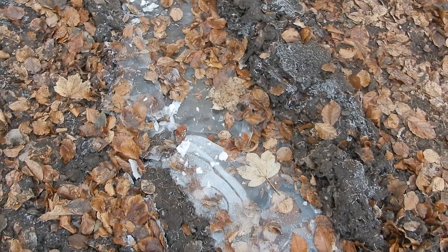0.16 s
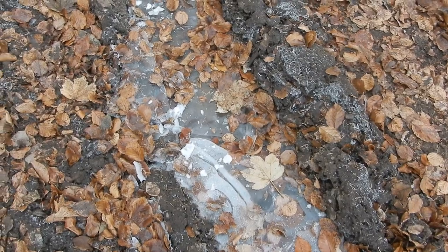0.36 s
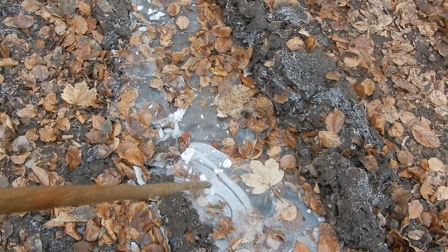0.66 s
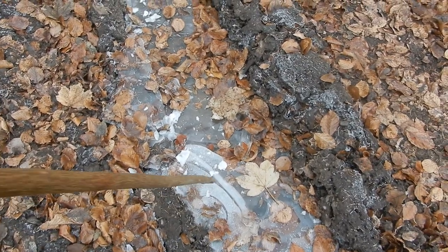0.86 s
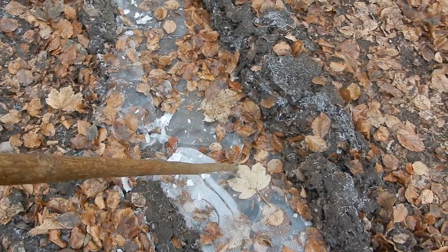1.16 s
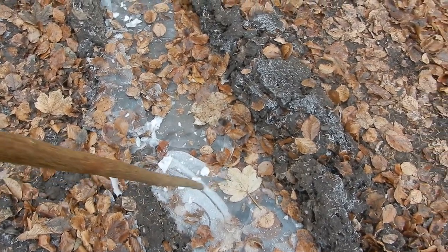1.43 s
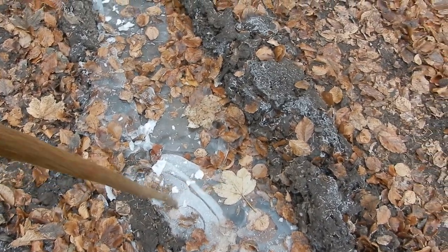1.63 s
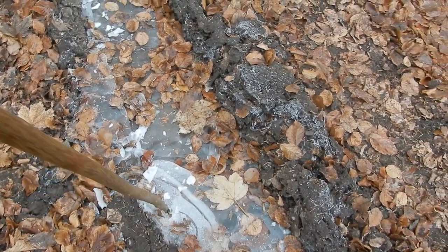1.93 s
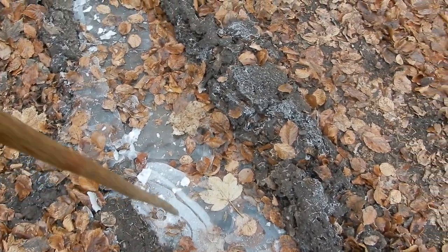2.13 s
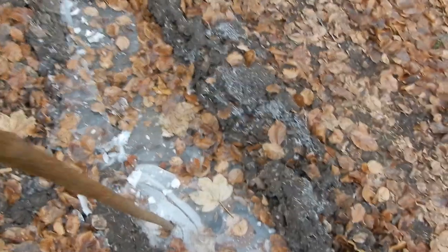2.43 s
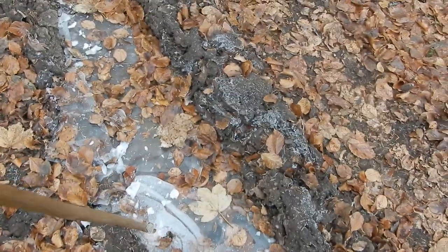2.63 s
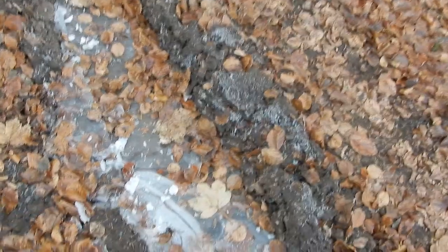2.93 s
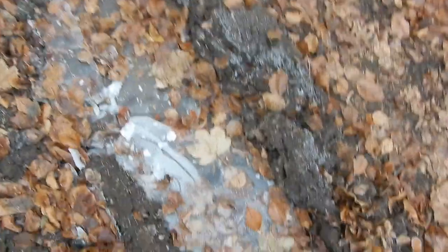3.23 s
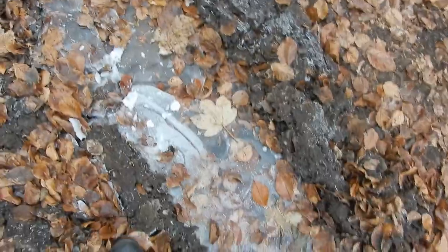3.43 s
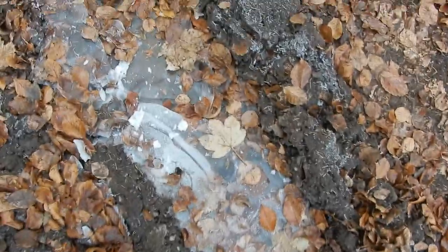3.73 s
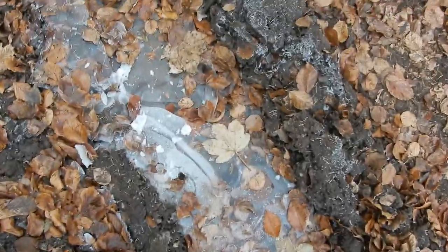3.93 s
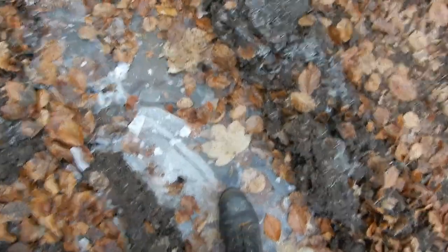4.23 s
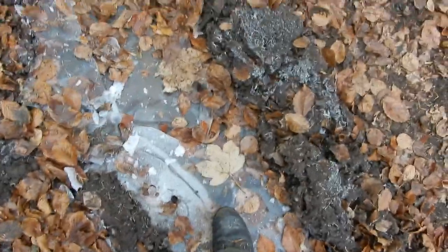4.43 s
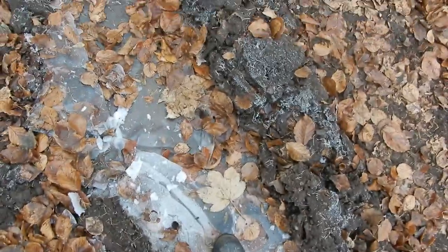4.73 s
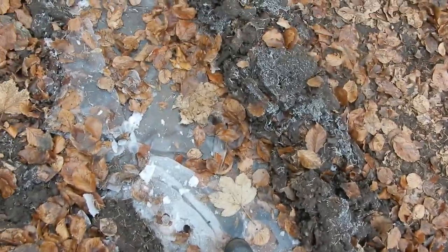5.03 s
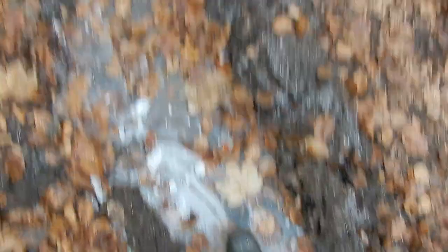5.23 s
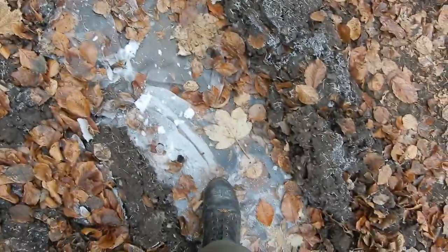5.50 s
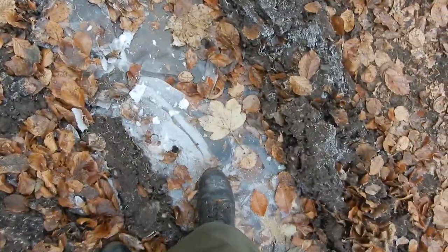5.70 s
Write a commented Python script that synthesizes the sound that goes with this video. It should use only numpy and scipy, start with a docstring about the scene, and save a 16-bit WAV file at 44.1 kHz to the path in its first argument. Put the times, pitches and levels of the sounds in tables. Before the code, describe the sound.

Thin puddle ice knocks and cracks under a poking stick, then crunches and splinters under a boot among frozen leaves.

```python
"""Breaking puddle ice in a wood

A stick pokes thin ice, then a boot treads on it among frozen leaves. The sheet thuds over its air
pocket, cracks snap and shed splinters, and each press crunches leaves, shards and frost.
Small pops hit the right microphone port and dull jolts come through the housing,
all over a faint resonant background."""
import sys
import numpy as np
from scipy import signal
from scipy.fft import rfft, irfft
from scipy.io import wavfile

SR = 44100
rng = np.random.default_rng(int(sys.argv[2]) if len(sys.argv) > 2 else 0)


def store_pcm(level_fs):
    """Save levels as 16-bit WAV."""
    pcm = np.round(np.clip(level_fs, -1, 1) * 32767).astype(np.int16)
    wavfile.write(sys.argv[1], SR, np.atleast_2d(pcm).T)


N = 258426
FFT_SIZE = N + 4096
HZ = np.maximum(np.fft.rfftfreq(FFT_SIZE, 1 / SR), 1)

# the background sinks and dulls for a while: (time [s], level [dB], treble shelf [dB])
BACKGROUND_RIDE = [(0, -56, 2), (1.1, -55, 1), (1.78, -56, 1.5), (1.85, -73.5, -12), (2.3, -69.5, -15.5),
                   (2.8, -71, -15.5), (3.1, -62, -16), (4.2, -52.5, -7.5), (5.0, -71, -5.5),
                   (5.86, -60.5, -3)]
# tone of the background: (frequency [Hz], level [dB])
BACKGROUND_EQ = [(25, -2.5), (161, -1), (624, -11), (1000, -21.5), (1560, -12.5), (2840, -32), (3300, -29),
                 (5900, -33), (6500, -38), (16000, -49)]
# bands that stand out of the background: (centre [Hz], width [Hz], boost [dB])
RESONANCES = [(797, 15, 1.5), (1002, 120, 15), (1610, 40, 3), (2410, 100, 13), (2835, 120, 21.5),
              (3400, 33, 11.5), (4120, 120, 10.5), (4800, 76, 4.5), (5400, 100, 4), (5900, 87, 6.5)]
# leaves rustling between the presses: (time [s], level [dB], frost over shards [dB])
LEAF_RUSTLE = [(0, -80, -13), (1.8, -70.5, -13), (2.05, -97.5, 2), (3.15, -95.5, 4), (3.3, -63.5, -10),
               (4.05, -54, 7), (4.35, -59, 0.5), (4.9, -62, 10.5), (5.03, -63, 4), (5.2, -56, 4.5),
               (5.45, -66, 4.5), (5.86, -60.5, 5)]
# pressure steps at the right port: (time [s], level [dB])
PORT_POPS = [(0.034, -16), (2.47, -32), (3.119, -20), (3.32, -11), (3.408, -12.5), (3.448, -16),
             (3.805, 0.5), (3.829, -2.5), (3.944, -5.5)]
# presses of stick or sole; a negative fade reverses the swell, slow in and quick out:
# (peak time [s], crunch [dB], fade by 20 dB [s], frost over shards [dB], grinding [dB])
PRESS_SWELLS = [(.1, -77, .15, 4, -69), (0.233, -60, 0.19, 1, -78), (.74, -67.5, 0.3, -7, -61),
                (1.235, -43.5, 0.0625, -8.5, -55), (1.278, -38.5, 0.0532, -5.5, -42),
                (1.869, -62, 0.02, -1, -56), (1.988, -63, 0.1142, -3, -54), (2.429, -66, .1, -4.5, -64.5),
                (2.618, -62.5, 0.09, 12, -66.5), (2.92, -90, -0.94, -1, -71), (3.24, -53.5, 0.17, 2.5, -48),
                (3.358, -46.5, 0.06, 8.5, -75), (3.522, -25.5, 0.037, 4, -42),
                (3.598, -37.5, 0.02, -6, -48.5), (3.682, -30, 0.1083, 9, -43), (3.818, -26, 0.0517, 5, -33),
                (3.892, -29, 0.14, 7, -43.5), (3.99, -60, 0.16, 8, -52.5), (4.5, -51.5, -0.41, 4, -84.5),
                (4.7, -51, 0.23, 6, -61), (4.829, -51.5, 0.21, 5.5, -69.5), (5.306, -45.5, 0.12, 1.5, -57),
                (5.619, -44.5, 0.15, 4.5, -59.5), (5.76, -66.5, 1.1, 13, -82)]
# modes of the ice sheet over its air pocket: (frequency [Hz], level [dB], free t60 [s])
SHEET_MODES = [(206, -1, .09), (272.7, 1, 0.085), (376, -8.5, 0.08), (488, -1.5, 0.045), (682, -4, 0.1),
               (950, 0.5, 0.0091), (1077, -16, 0.11)]
# tone of the coarse shards: (frequency [Hz], level [dB])
SHARD_EQ = [(760, -50), (1300, -25.5), (1930, -7), (2100, -4.5), (2430, -3.5), (2660, 0), (3460, -0.5),
            (6000, -6), (7800, -34), (13200, -120)]
# tone of the fine frost: (frequency [Hz], level [dB])
FROST_EQ = [(2060, -33.5), (3500, -29), (4780, -17), (6490, -5.5), (7500, -3), (8210, -6), (8970, -9),
            (11100, -3.5), (14300, -20), (16000, -19)]
# snaps of breaking ice: (time [s], level [dB], pitch [Hz], splinter shower t60 [s])
ICE_CRACKS = [(0.3726, -54, 3000, 0.034), (1.124, -25.5, 3500, 0.062), (1.1781, -19.5, 1660, 0.056),
              (1.2869, -30.5, 2840, 0.013), (1.309, -42, 3000, 0.017), (1.334, -36.5, 3136, .04),
              (1.7988, -4, 3400, 0.032), (1.8154, -23.5, 1760, 0.16), (1.8401, -23, 2770, 0.0046),
              (1.9496, -40, 1666, 0.031), (1.9665, -40.5, 2160, 0.039), (1.988, -32.5, 2820, 0.065),
              (2.0957, -42, 1830, 0.047), (2.112, -56, 1910, 0.015), (2.162, -57, 1814, 0.063),
              (2.174, -58, 8000, 0.013), (2.2032, -52.5, 1754, 0.025), (2.284, -53.5, 6210, 0.021),
              (2.335, -60, 8100, 0.016), (2.3517, -11, 2030, 0.061), (2.3622, -15.5, 1600, 0.029),
              (2.383, -26, 2740, 0.084), (2.66, -59, 2500, 0.018), (2.68, -56, 7000, 0.014),
              (2.69, -56, 3500, 0.016), (3.2058, -33.5, 1580, 0.09), (3.229, -25, 2020, 0.12),
              (3.262, -25.5, 2700, 0.045), (3.3438, -31.5, 7300, 0.025), (3.4616, -28.5, 6760, 0.54),
              (3.5525, -14, 6000, 0.081), (3.6608, -26, 6540, 0.053), (3.71, -20, 5470, 0.11),
              (3.72, -29, 5000, 0.007), (3.7535, -25.5, 4100, 0.16), (3.7767, -20.5, 6100, 0.029),
              (3.806, -20, 5100, 0.028), (3.8523, -23, 6160, 0.024), (3.9336, -20.5, 10600, 0.016),
              (3.968, -24, 6200, 0.053), (4.0512, -31, 5620, 0.01), (4.1996, -39.5, 3070, 0.038),
              (4.2763, -15, 8400, .18), (4.2981, -10, 7140, 0.049), (4.3326, -12, 6800, 0.11),
              (4.3422, -9, 7840, .063), (4.3637, -18, 3320, 0.066), (4.4214, -28.5, 4600, 0.017),
              (4.4381, -15.5, 4800, 0.026), (4.4566, -35, 7550, 0.013), (4.4672, -26, 7550, 0.039),
              (4.4847, -30, 2730, 0.068), (4.497, -32.5, 3070, 0.024), (4.5073, -31, 7900, 0.058),
              (4.5501, -27, 8360, 0.038), (4.5558, -34, 7870, .022), (4.6119, -24.5, 8100, 0.021),
              (4.7267, -14, 7260, 0.2), (4.748, -11.5, 4800, 0.12), (4.7628, -8.5, 7280, 0.054),
              (4.796, -29, 7000, 0.018), (4.8107, -28.5, 7500, 0.043), (4.845, -40, 6000, .015),
              (4.8624, -33, 7200, 0.063), (5.1173, -43, 2610, 0.028), (5.411, -45, 7570, 0.017),
              (5.4888, -12.5, 5700, 0.062), (5.498, -12, 6700, 0.055), (5.5233, -16, 8200, 0.076),
              (5.54, -20, 6590, 0.22), (5.554, -24.5, 7900, 0.014), (5.5623, -21, 11300, 0.0074),
              (5.664, -36, 4400, 0.0086), (5.72, -36, 6360, 0.084), (5.8121, -40, 4900, 0.022),
              (5.839, -44.5, 2500, .03)]
# knocks on the hollow sheet: (time [s], level [dB], lowest mode [Hz], brightness [dB])
SHEET_THUDS = [(0.623, -42, 170, -10), (0.686, -39, 161, -8), (0.718, -41, 189, -11),
               (0.797, -42.5, 182, -26), (1.124, -6, 206, 1.5), (1.135, -8, 206, -5),
               (1.175, -11.5, 230.5, -11.5), (1.185, -16, 222, -34), (1.207, -14, 204, -12.5),
               (1.229, -20.5, 206, -8), (1.247, -23.5, 186, -7.5), (1.653, -47, 141, -25),
               (1.8, -19, 206, 14.5), (1.811, -26, 263, 1), (1.949, -54, 220, 10), (1.967, -44, 223, 13),
               (1.989, -41.5, 222, 10), (2.022, -55.5, 215, 9), (2.355, -21, 216.5, 8.5),
               (2.362, -25, 306, -10), (3.205, -24, 251, 7.5), (3.23, -26.5, 269.5, 19),
               (3.514, -25, 157, -23), (3.691, -27.5, 240, -23), (3.809, -18.5, 200, 9),
               (4.276, -29, 262, -25), (4.301, -11.5, 253.5, -26), (4.342, -23.5, 268, -15),
               (4.436, -37, 307, -23), (4.731, -34.5, 290, -12), (4.756, -25, 262, 7.5),
               (4.864, -49, 250, -3), (5.490, -23, 255, -5.5), (5.539, -28.5, 292, 1),
               (5.557, -29, 205, -6.5)]
# bumps through the hand-held housing: (time [s], level [dB])
HOUSING_JOLTS = [(1.798, -23.5), (4.3, -39), (4.749, -38.5)]
# stereo width from scattered directions: (frequency [Hz], side level [dB])
WIDTH_EQ = [(300, -18), (2000, -18), (6000, -11.5), (14000, -4.5)]
# balance of the two ports: (frequency [Hz], left minus right [dB])
BALANCE_EQ = [(200, -2), (1500, -1), (4000, 0), (12000, 1.35)]


def amp(db):
    """Decibels to gain."""
    return 10 ** (np.asarray(db) / 20)


def unit_rms(x):
    """Scale to unit power."""
    return x / np.sqrt(np.mean(x ** 2) + 1e-20)


def automation(rows):
    """The columns of a table over time, as one curve each."""
    times, *columns = np.transpose(rows)
    return [np.interp(np.arange(N) / SR, times, column) for column in columns]


def eq_curve(points):
    """A table over frequency, read on the whole FFT grid."""
    hz, db = np.transpose(points)
    return np.interp(np.log(HZ), np.log(np.maximum(hz, 1)), db)


def equalize(x, response):
    """Filter by a frequency response."""
    return irfft(rfft(x, FFT_SIZE) * response, FFT_SIZE)[..., :N]


def lowpass(x, hz):
    """Two-pole high cut."""
    return signal.lfilter(*signal.butter(2, np.clip(hz, 50, 20000), fs=SR), x)


def highpass(x, hz):
    """Two-pole low cut."""
    return signal.lfilter(*signal.butter(2, hz, "high", fs=SR), x)


def add(track, time_s, sound):
    """Mix a short sound in at its cue."""
    start = max(round(time_s * SR), 0)
    track[start:start + len(sound)] += sound[:N - start]


def ring(x, hz, t60):
    """Resonator: a unit click sets off a dying sine of height 1."""
    decay, step = amp(-60 / (max(t60, 1e-4) * SR)), 2 * np.pi * hz / SR
    return signal.lfilter([0, np.sin(step)], [1, -2 * decay * np.cos(step), decay ** 2], x + 1e-18)


def background(shelf_hz=3100):
    """A bed of noise with a few resonant bands, partly shared by both sides."""
    level_db, treble_db = automation(BACKGROUND_RIDE)
    bands_db = sum(db / (1 + (2 * (HZ - hz) / width) ** 2) for hz, width, db in RESONANCES)
    mid, side = rng.standard_normal((2, N))
    pair = np.array([mid + 0.7 * side, mid - 0.45 * side]) * amp([[-1.5], [1.5]])
    bed = unit_rms(equalize(pair, amp(eq_curve(BACKGROUND_EQ) + bands_db)))
    treble = equalize(bed, HZ > shelf_hz)
    return amp(level_db) * (bed - treble + amp(treble_db) * treble)


def debris_gains(db, frost_db):
    """Gains of coarse shards and fine frost for a level and a balance."""
    return amp([db - frost_db / 2, db + frost_db / 2])


def grains(per_s, spread_db, clump_hz, clump_db):
    """Random clicks of very uneven size that come in clumps."""
    clumps = amp(clump_db * unit_rms(lowpass(rng.standard_normal(N), clump_hz)))
    sizes = amp(spread_db * np.minimum(rng.exponential(1, N), 4.0)) * rng.choice([-1, 1], N)
    return unit_rms(sizes * clumps * (rng.random(N) < per_s / SR))


def tinkle(clicks, sizes=16, cycles=16.0, patchy_db=5.0):
    """Every bit rings briefly at a pitch set by its size; each size comes and goes on its own."""
    pitches = np.geomspace(1500, 15000, num=sizes) * amp(rng.normal(0, .4, sizes))
    size_of_click = rng.integers(0, sizes, N)
    drifts = signal.lfilter(*signal.butter(1, .08), rng.standard_normal((sizes, N // 256 + 2)))
    bits = np.zeros(N)
    for size, (hz, drift) in enumerate(zip(pitches, drifts)):
        drift_db = patchy_db * np.interp(np.arange(N) / 256, np.arange(len(drift)), unit_rms(drift))
        bits += hz * amp(drift_db) * ring(clicks * (size_of_click == size), hz, cycles / hz)
    return unit_rms(bits)


def debris():
    """Two textures of frozen leaves and broken ice: coarse shards and fine frost."""
    coarse = grains(per_s=4300, spread_db=1.4, clump_hz=150, clump_db=2.7)
    fine = grains(per_s=10000, spread_db=1.8, clump_hz=180, clump_db=3.1)
    bits = tinkle(coarse + fine)
    shards = unit_rms(equalize(bits + coarse + 0.05 * fine, amp(eq_curve(SHARD_EQ))))
    frost = unit_rms(equalize(0.66 * bits + fine + 0.05 * coarse, amp(eq_curve(FROST_EQ))))
    return shards, frost


def pops(pitch_hz=181, edge_hz=1170, left_db=-24):
    """A sudden pressure step at the right port: one quick swing, hardly heard on the left."""
    clicks = np.zeros(N)
    for time_s, db in PORT_POPS:
        add(clicks, time_s, amp([db]))
    pulses = lowpass(lowpass(clicks, edge_hz), 1.3 * edge_hz)
    swing = ring(np.diff(pulses, prepend=0), pitch_hz, t60=0.0091) * SR / (2 * np.pi * pitch_hz)
    return swing * amp([[left_db], [0]])


def presses(rise_share=0.58, roundness=1.23):
    """Each press swells and fades over the rustle; gives the debris and grinding envelopes."""
    t = np.arange(N) / SR
    loose, weight = debris_gains(*automation(LEAF_RUSTLE)), np.zeros(N)
    for peak_s, db, fade_s, frost_db, grind_db in PRESS_SWELLS:
        from_peak = np.maximum((t - peak_s) / fade_s, (peak_s - t) / (rise_share * fade_s))
        swell = amp(-20 * from_peak ** roundness)
        loose += debris_gains(db, frost_db)[:, None] * swell
        weight += amp(grind_db) * swell
    return loose, weight


def sheet(force, lowest_hz, brightness, sustain):
    """The ice rings in its modes: higher if small, brighter under a hard tip, shorter when loaded."""
    body = np.zeros(len(force))
    for k, (hz, db, t60) in enumerate(SHEET_MODES):
        ratio = hz / SHEET_MODES[0][0]
        gain = (-1) ** k * amp(db + 0.66 * brightness * np.log2(ratio))
        body += gain * ring(force, ratio * lowest_hz, t60 * sustain)
    return body


def grinding():
    """Small contacts rub on the ice: a dry rasp with a little of the sheet's hollow ring."""
    rubbing = lowpass(grains(per_s=1500, spread_db=4.0, clump_hz=60, clump_db=3.0), 900)
    rasp = rubbing - lowpass(rubbing, 250)   # small contacts radiate no bass
    hollow = sheet(rubbing, lowest_hz=235, brightness=0.71, sustain=1.0)
    return unit_rms(unit_rms(hollow) + 8.7 * unit_rms(rasp))


def crunch(showers):
    """Presses and splinter showers ride the levels of grinding, shards and frost."""
    loose, weight = presses()
    showers = lowpass(showers, 150)   # splinters need a moment to start falling
    grind = (weight + 0.29 * showers[0]) * grinding()
    splinters = np.sum((loose + showers) * debris(), axis=0)
    return grind + 0.59 * splinters


def snaps(tear_s=0.0008, cycles=11):
    """A fracture tears through in a few milliseconds: a short ping plus a broad crack."""
    track = np.zeros(N)
    progress = np.arange(512) / SR / tear_s
    for time_s, db, hz, _ in ICE_CRACKS:
        tear = rng.standard_normal(progress.size) * progress * np.exp(1 - progress)
        ping = ring(tear, hz, cycles / hz)
        crack = lowpass(tear, 3 * hz)
        add(track, time_s, amp(db) * (ping / np.abs(ping).max() + 0.39 * crack))
    return highpass(track, 1420)   # a fracture radiates no bass


def splinter_showers():
    """Every snap sheds a dying shower of splinters; gives the shard and frost envelopes."""
    showers, t = np.zeros((2, N)), np.arange(round(.25 * SR)) / SR
    for time_s, db, hz, t60 in ICE_CRACKS:
        t60 = max(t60, .005)
        shower_db = db - 11 + 0.5 * np.log2(t60 / 0.06)   # long showers are a touch louder
        frost_db = 7 * np.log2(hz / 3700)   # a higher snap sheds finer splinters
        for shower, gain in zip(showers, debris_gains(shower_db, frost_db)):
            add(shower, time_s, gain * amp(-60 * t / t60))
    return showers


def thuds():
    """Stick or boot knocks the hollow sheet: first a light touch, then the weight follows."""
    track, force = np.zeros(N), np.zeros(round(.2 * SR))
    force[[0, round(.005 * SR)]] = .7, 1.05
    push = lowpass(force, 1700)
    for time_s, db, lowest_hz, brightness in SHEET_THUDS:
        thud = sheet(push, lowest_hz, brightness, sustain=0.53)
        add(track, time_s, amp(db) * thud / np.abs(thud).max())
    return highpass(track, 130)   # a small sheet radiates no deep bass


def jolts():
    """A bump through the housing: one low swing that both ports feel."""
    clicks = np.zeros(N)
    for time_s, db in HOUSING_JOLTS:
        add(clicks, time_s, -amp([db]))
    return ring(clicks, hz=40, t60=0.044)


def two_ports(x, left_lead_s=25e-6):
    """Two close ports: the left hears a little earlier; each grain comes from its own direction."""
    direction = unit_rms(lowpass(rng.standard_normal(N), 320))
    side = equalize(x * direction, amp(eq_curve(WIDTH_EQ)))
    half = np.array([[.5], [-.5]])
    balance = amp(half * eq_curve(BALANCE_EQ))
    time_shift = np.exp(2j * np.pi * HZ * half * left_lead_s)
    return equalize(np.array([x + side, x - side]), balance * time_shift)


def scene():
    """Ice and leaves spread across the two ports, with pops, jolts and the background bed."""
    ice = snaps() + crunch(splinter_showers()) + thuds()
    return two_ports(ice) + pops() + jolts() + background()


def record(dry, notch_hz=1326, notch_width_hz=370, low_cut_hz=58, high_cut_hz=16600):
    """The housing scoops out one band, the bass rolls off, peaks are rounded, the top is cut."""
    band = signal.lfilter(*signal.iirpeak(notch_hz, notch_hz / notch_width_hz, fs=SR), dry)
    thinned = highpass(dry - .7 * band, low_cut_hz)
    rounded = .9 * np.tanh(thinned / .9)
    return signal.sosfilt(signal.cheby2(20, 80, high_cut_hz, fs=SR, output="sos"), rounded)


dry = scene()
out = record(dry)
store_pcm(out)
```